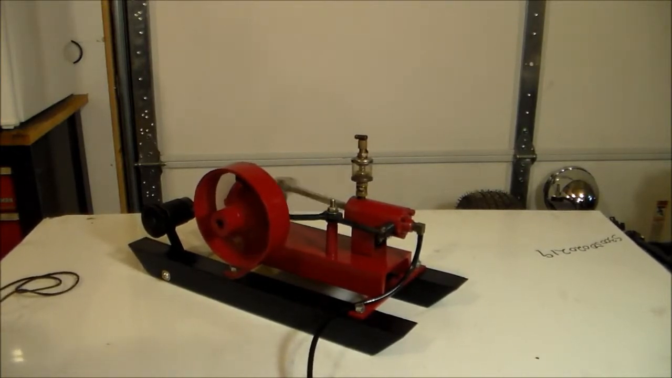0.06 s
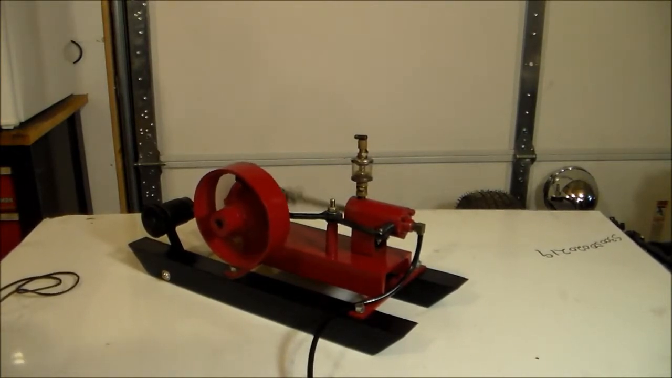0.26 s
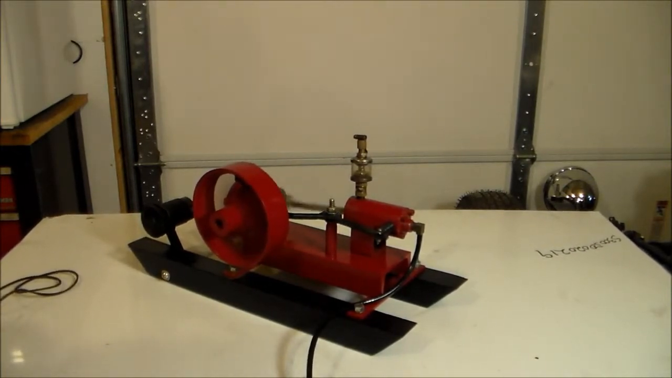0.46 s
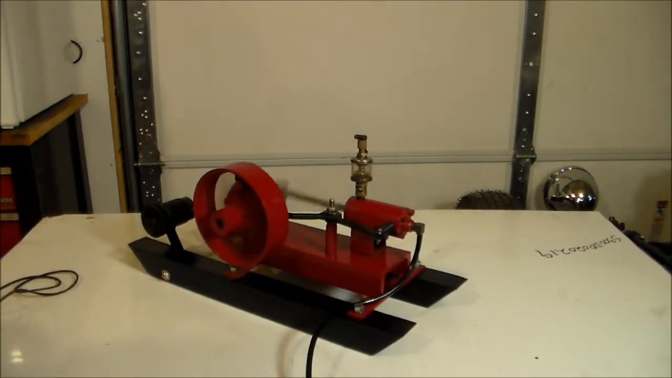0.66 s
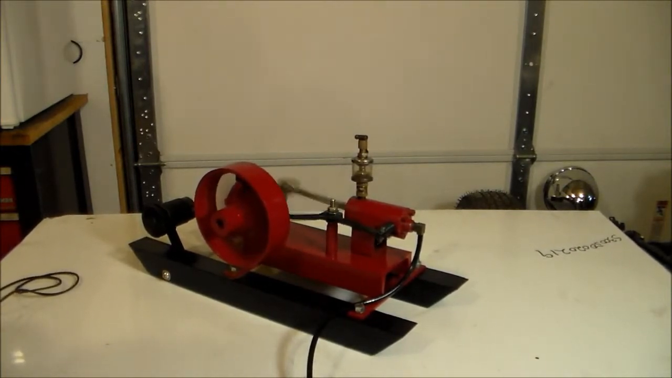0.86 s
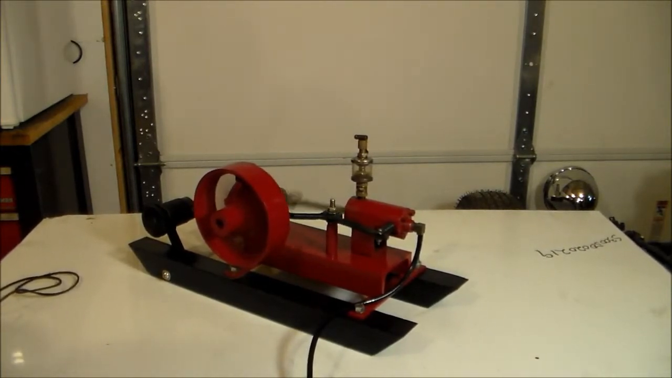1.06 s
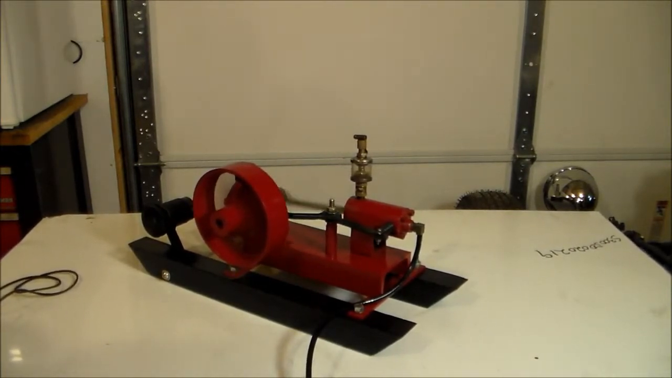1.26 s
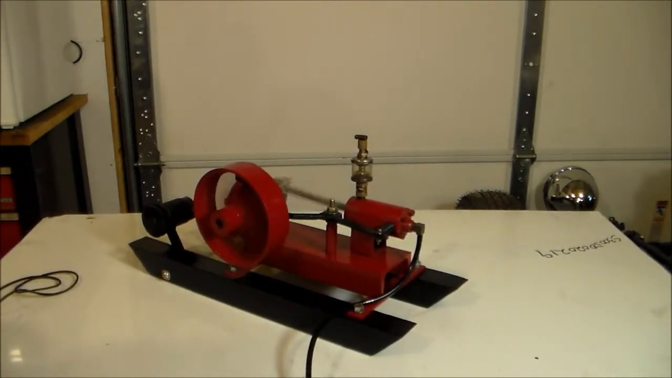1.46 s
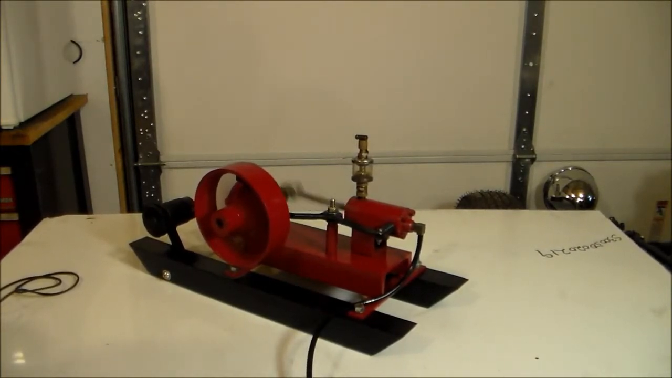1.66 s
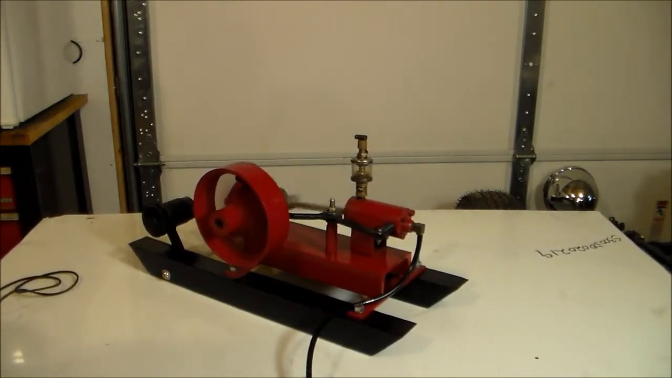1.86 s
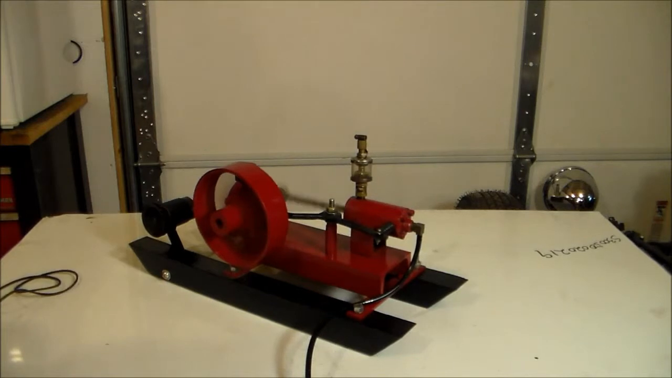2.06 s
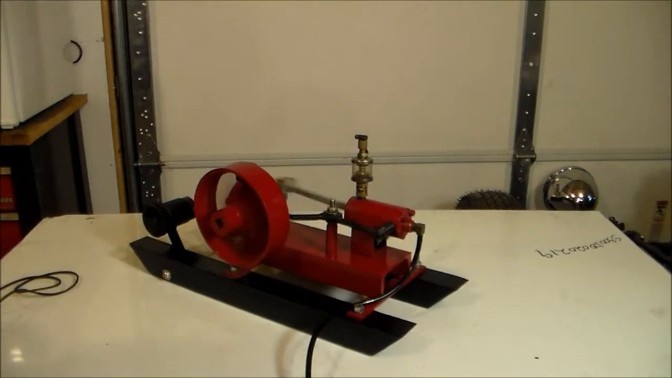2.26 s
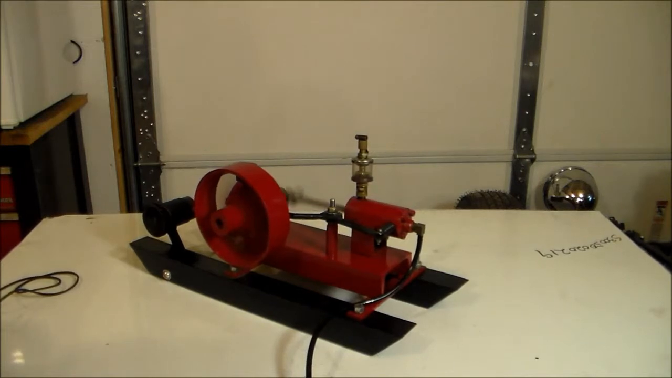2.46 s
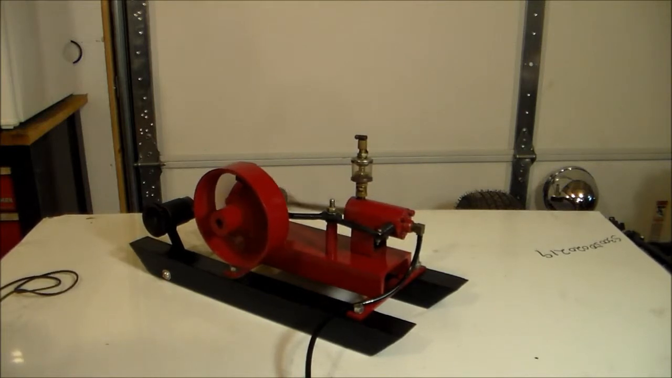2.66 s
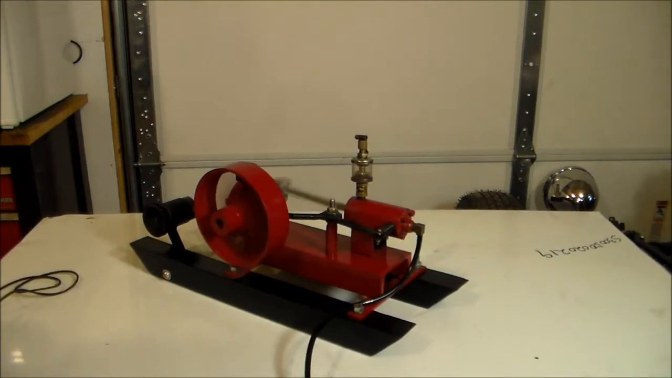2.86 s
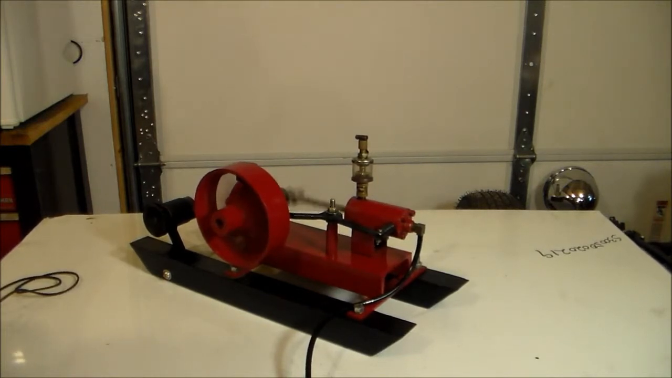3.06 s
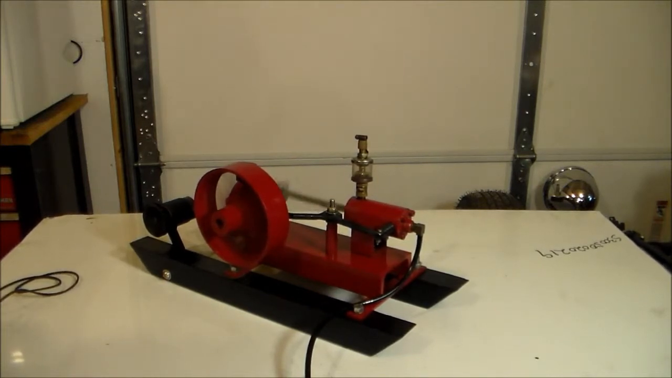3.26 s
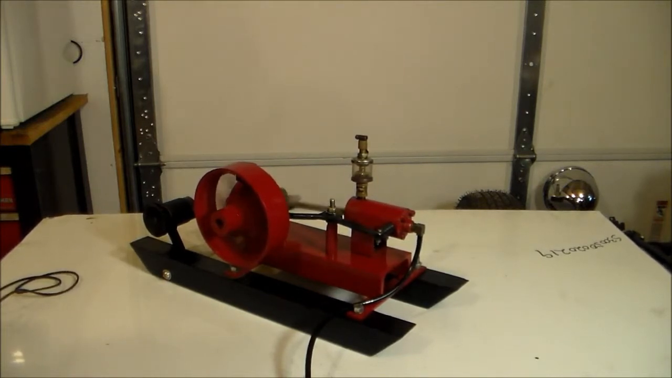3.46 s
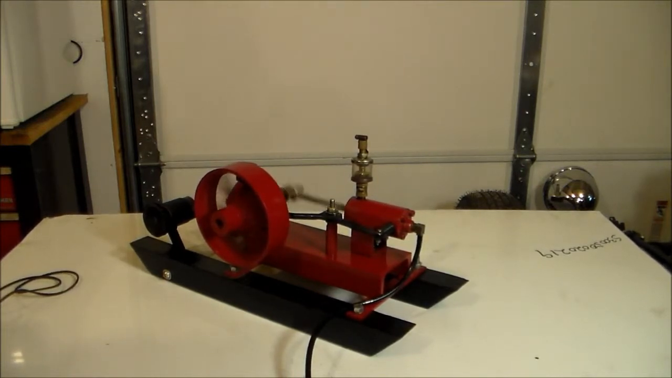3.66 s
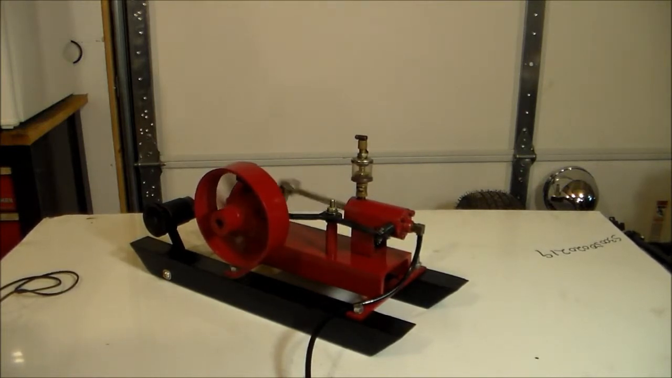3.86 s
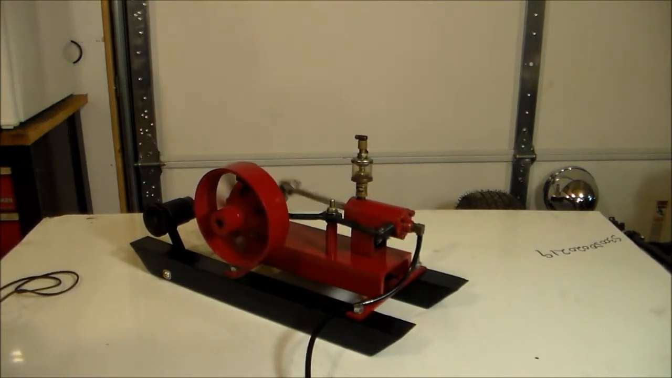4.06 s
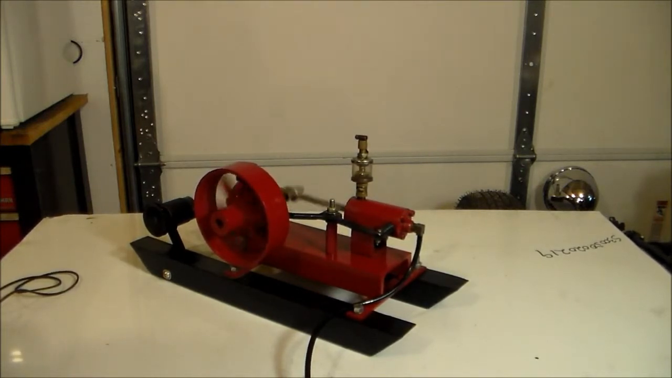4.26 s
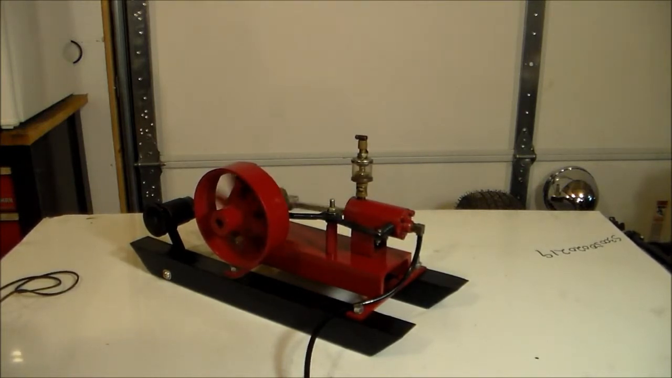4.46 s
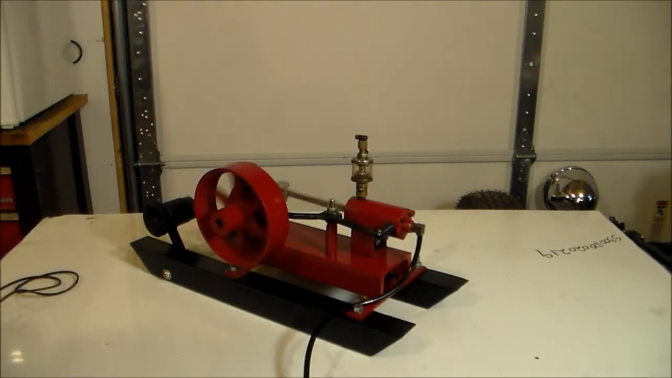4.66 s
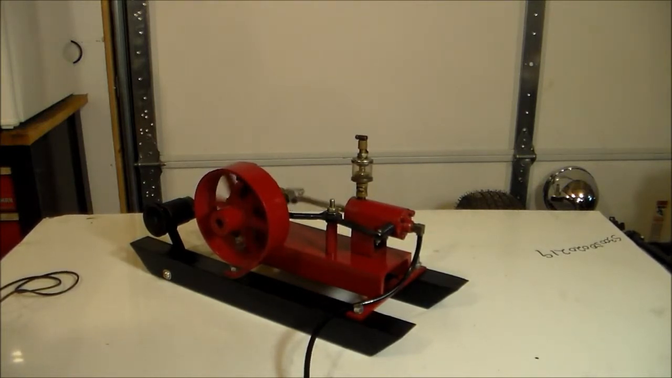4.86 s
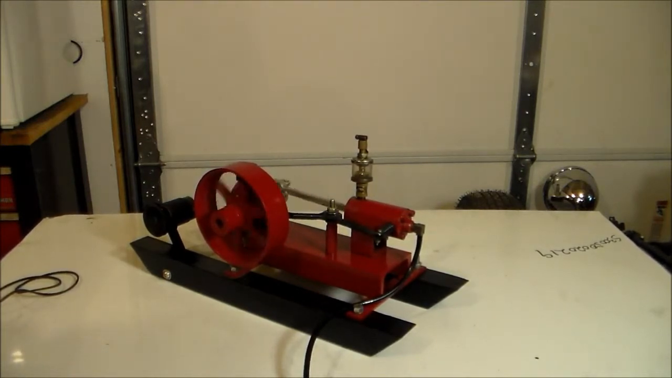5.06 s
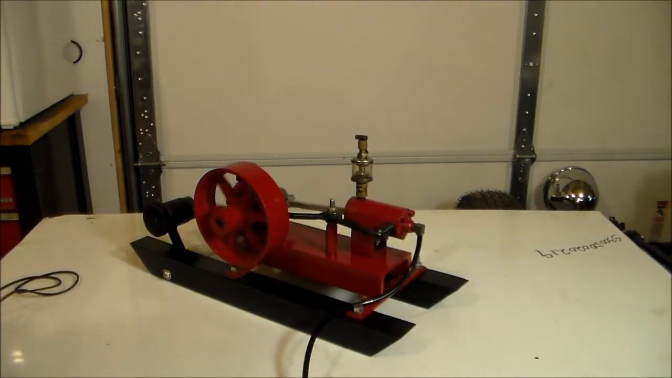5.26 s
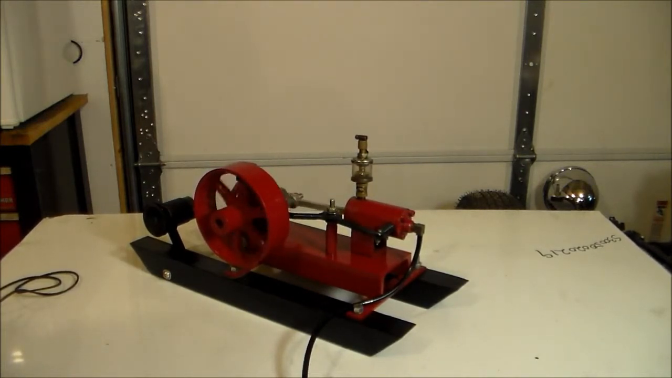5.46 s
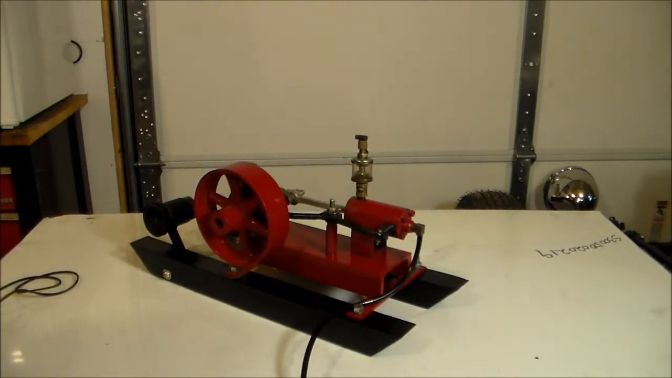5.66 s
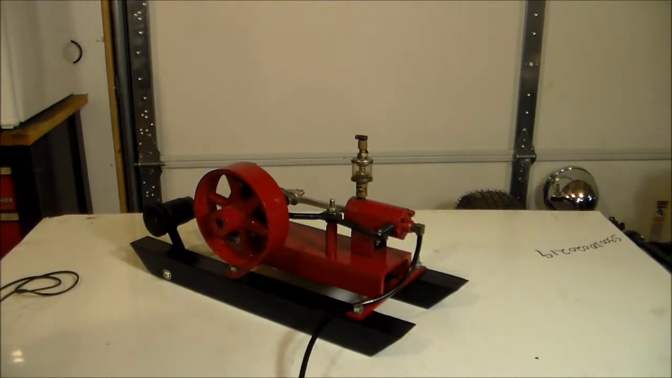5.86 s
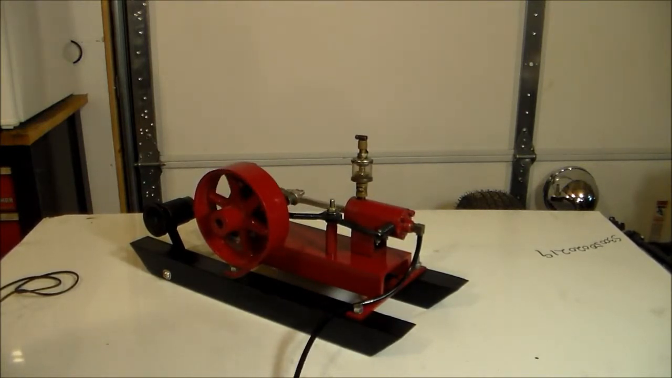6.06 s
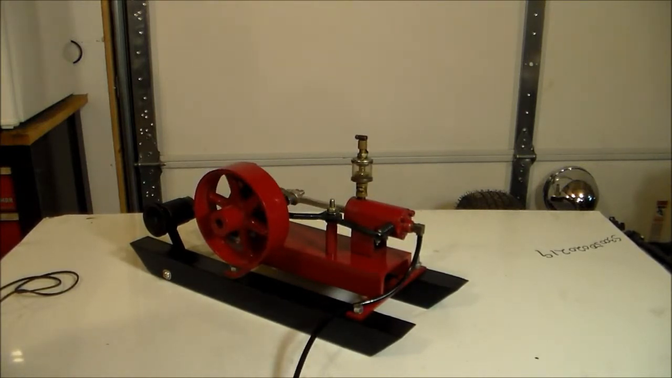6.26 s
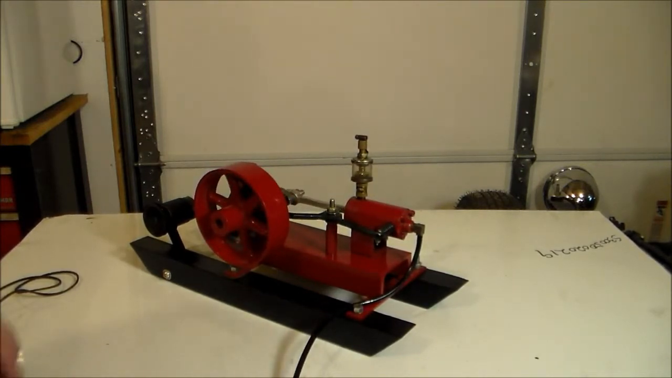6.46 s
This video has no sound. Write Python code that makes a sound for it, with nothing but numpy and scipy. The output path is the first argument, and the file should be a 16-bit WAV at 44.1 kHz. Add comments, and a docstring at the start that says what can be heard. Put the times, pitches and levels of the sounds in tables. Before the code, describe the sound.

A small air-driven model engine clatters fast and evenly, then slows to separate metallic knocks and stops in a quiet workshop.

```python
"""On a workshop table a small single-cylinder model engine runs on compressed air, then coasts to a
stop with the air shut off. The crank angle times the contacts: once a turn the valve gear ticks and the
slack linkage knocks twice, rattling in between; each impact excites the modes of the frame. The exhaust
puffs, bearings rub and air leaks. Slow turns knock duller and bounce. The flywheel comes to rest with
a few soft ticks, and something shuffles faintly in the room."""
import sys
import numpy as np
from scipy import signal
from scipy.fft import rfft, irfft
from scipy.io import wavfile
from scipy.ndimage import uniform_filter1d

SR = 44100
rng = np.random.default_rng(int(sys.argv[2]) if len(sys.argv) > 2 else 0)


def output_pcm(signal):
    """Save a mono or channel-first signal as 16-bit PCM at the path in sys.argv[1].

    Samples are clipped to [-1, 1] before scaling.
    """
    pcm = np.clip(np.atleast_2d(signal).T, -1, 1) * 32767
    wavfile.write(sys.argv[1], SR, np.round(pcm).astype(np.int16))


N = 287973
TAPS = 16384
GRID_HZ = np.maximum(np.arange(TAPS // 2 + 1) * SR / TAPS, 1)

# Levels in all tables are relative: each source applies its own gain.
# flywheel speed, steady and then braked by friction: time_s, turns_per_s
FLYWHEEL_SPEED = [(0.0, 8.736), (1.0, 8.633), (2.2, 8.618), (2.85, 8.566), (3.15, 8.001), (3.7, 6.249),
                  (4.4, 4.215), (4.95, 2.725), (5.6, 0.0)]

# contacts made once a turn: turns_per_s, level_db, body_db, treble_db
TAKE_UP_KNOCK = [(2, -22, 1, -7.5), (3.5, -26.5, 2, -4), (5, -24, 3.5, -5.5), (7, -25.5, 0, -4),
                 (8.6, -26, -1.5, 1.16)]  # the linkage takes up its slack
REBOUND_CLICK = [(3.3, -41, -2, 2), (4, -30, 0, -0.5), (5.8, -28.5, 1, 2), (7.2, -36, 0, 6),
                 (8.6, -38.5, 7.5, 2)]  # it rebounds crisply
GUIDE_CLICK = [(4.4, -47, -6, -9), (5.5, -31, 2, -6), (7, -31.5, 5, -11), (8.6, -29.5, 0.5, -0.5)]  # it clips its guide
FALL_BACK_KNOCK = [(2, -23, -5, -16), (3.2, -23, -3.5, -7), (3.9, -24.5, -0.5, 0), (4.8, -27, 3.5, 2.5),
                   (8.6, -27, 1.7, 1)]  # it falls back
VALVE_TICK = [(2.2, -44, 9, -9), (3.8, -44, 12.5, -19.5), (5.5, -44, 10, -30), (8.6, -50.5, 14, -23)]  # the valve gear ticks softly
# single contacts on the last turns: start_s, level_db, body_db, treble_db
LINKAGE_BOUNCES = [(4.518, -30, -7, -4.5), (4.788, -27.5, 5, -3), (4.799, -26, 0, -2.5),
                   (5.194, -26, -5, -10.5)]
BEARING_TICKS = [(4.860, -36, -8, -13), (4.913, -42, 12, -13), (5.297, -48, 12.5, -7),
                 (5.402, -49.5, 15, -2)]
# slow swell in the weight of the take-up knock: time_s, gain_db
KNOCK_SWELL = [(0, 1), (1.03, -3), (1.17, 1.4), (2.3, 0), (2.43, -2.8), (2.88, -2.5), (3.02, 2), (3.3, -4),
               (3.6, 0)]
# noises of the running engine: time_s, rub_db, leak_db, rattle_db
RUNNING_LEVELS = [(0, -45, -42, -33.5), (2, -49.5, -41, -31), (2.9, -43, -43.5, -32.5),
                  (3.4, -47.5, -51, -35), (3.9, -45.5, -70, -36), (4.4, -48, -65, -52),
                  (4.85, -53.5, -54, -55), (5.2, -70, -69, -56), (5.55, -71, -76, -75),
                  (6.53, -80, -81, -80)]
# sources whose strength follows the speed: turns_per_s, level_db
EXHAUST_LEVEL = [(2, -34.5), (4.6, -33.5), (6, -39.5), (7.3, -33), (8.6, -47)]
DRAG_LEVEL = [(0, -79), (.5, -56.5), (2, -39), (4, -35), (6.5, -49), (8.6, -45)]
JET_LEVEL = [(0, -100), (2.5, -77), (5, -58), (7.5, -59), (8.6, -54)]
RIM_LEVEL = [(0, -100), (2, -72), (4.5, -54), (6.5, -54.5), (8.6, -49)]
# load on the crank around one turn: angle_turns, gain_db
CRANK_LOAD = [(.2, -3), (.5, -5), (.82, -20), (.88, 0.5)]

# resonances: pitch_hz, width_hz, level_db
FRAME_MODES = [(178.6, 13.4, 1.5), (242, 23, -2.5), (308, 26, -2), (404.3, 21, 1), (471.4, 19, -1.5),
               (574, 29, -2), (625, 27, 2), (715, 93, -2.5), (769, 31, -1), (865, 62, -1.5), (962, 41, 4.5),
               (1026, 5.9, 10.5), (1178, 26, 4), (1307, 31, 4), (1480, 83, -1), (1693, 65, -1),
               (2285, 14, 11), (2382, 3.6, 8.5), (2390, 136, 6), (2686, 62, 2.5), (2950, 6.1, 7.5),
               (3520, 79, 7.5), (3760, 35, 5.5), (4130, 150, 3), (4660, 230, -4.5), (5350, 33, 1.5),
               (7320, 970, 1.5), (8700, 29, 5.5), (9860, 130, 5.5), (12500, 340, -11)]  # frame, flywheel and table together
TAKE_UP_MODES = [(1330, 230, 6.5), (1725, 110, 3), (2400, 220, 4.5), (3530, 41, 3.5)]  # heard mainly from the first knock
FALL_BACK_MODES = [(823, 130, 3.5), (2700, 110, 5), (5500, 31, 0.5), (9670, 90, 8), (12000, 70, 4)]  # heard mainly from the second
FLYWHEEL_MODES = [(282, 10, 2), (1044, 20, 9), (1122, 9.9, 17.5), (2420, 38, 10)]  # ring on after light contacts
DRAG_MODES = [(113.6, 8.2, 2), (201, 18, -4.5), (281, 3.9, 4.5), (454, 22, -1), (593, 31, 5),
              (712, 32, 1.5), (940, 60, -22), (1090, 20, 4.5), (1200, 24, 1), (2480, 120, -3)]  # stirred by the dragging crank
RIM_MODES = [(2300, 36, 1.5), (2365, 35, -1.5)]  # flywheel rim, driven by the rubbing bearing
JET_MODES = [(8740, 210, 0)]  # thin sizzle of the air jet at the valve
WHISTLE_MODES = [(2620, 60, -12), (2730, 21, 15), (8780, 230, -12)]  # air passing the valve
# broad spectra: frequency_hz, level_db
DAMPED_MODE_BED = [(40, -17), (90, -9.5), (340, -13), (530, -20), (660, -2), (1400, -5), (2000, -2),
                   (3200, -2), (5000, -3.5), (6000, -7), (8200, -15), (9000, -2.5), (10500, -2.5),
                   (11700, -6), (14000, -3)]  # overlapping modes beneath the frame's distinct ones
RUB_SPECTRUM = [(60, 3), (170, 11), (450, 5), (1000, 6.5), (1700, 0.5), (2320, -1.5), (3000, 1), (6000, 0),
                (14000, -18)]
LEAK_SPECTRUM = [(500, -1.5), (2500, 5), (5500, -1.5), (6700, 0), (8000, -3.5), (9000, -1), (10500, -5),
                 (11500, 3.5), (14000, -3.5)]
ROOM_NOISE_SPECTRUM = [(20, -0.5), (32, 1.5), (60, -7), (120, -9), (200, -25), (500, -24), (1500, -26),
                       (2600, -28), (5000, -36), (9000, -32.5), (14000, -35)]
SHUFFLE_SPECTRUM = [(40, 4.5), (110, -1), (150, -13), (198, 5.5), (250, -8), (450, -5), (800, -14.5),
                    (2000, -17.5), (3600, -17.5), (5000, -28), (12000, -52)]
MICROPHONE_SPECTRUM = [(20, 2), (60, -6.5), (120, -14), (250, -20.5), (600, -14.5), (1500, -22),
                       (5000, -22.5), (8500, -30), (14000, -28)]

# quiet sounds of the room: time_s, room_noise_db, shuffle_db
AMBIENT_LEVELS = [(0, -59.5, -65), (5.55, -61, -100), (5.76, -51, -59), (5.96, -54.5, -62.5),
                  (6.1, -56.5, -48), (6.2, -57, -52), (6.33, -59, -57.5), (6.53, -57, -68)]
# reverberation time of the workshop: frequency_hz, t60_s
ROOM_T60 = [(150, 1.46), (400, 0.27), (1000, 0.47), (2800, 0.29), (7300, 0.23), (14000, 0.46)]
# strength of its echoes: frequency_hz, level_db
ECHO_LEVEL = [(150, -2), (400, 2.5), (1000, -3.5), (2000, -10.5), (4000, -8), (8000, -8), (14000, -11)]
# diffuse sound at two close microphone ports: frequency_hz, side_over_mid_db
STEREO_WIDTH = [(30, -13), (70, -21), (160, -20), (1400, -24), (2500, -61), (3600, -9.5), (4800, 1),
                (6000, 2.5), (14000, 2)]
# balance of the ports: frequency_hz, left_over_right_db
STEREO_BALANCE = [(30, -9.5), (90, 1.27), (4000, -1.2), (5000, 0.1), (7200, 3), (10500, 2.5), (13000, -1)]


def crank():
    """Angle is the integral of speed: (turns_per_s, angle_turns) at every sample."""
    speed, = in_time(FLYWHEEL_SPEED)
    return speed, .059 + np.cumsum(speed) / SR


def each_turn(angle, strength, scatter_db, advance_turns=0):
    """Rotation repeats a contact once a turn: rows of start_s, level_db, body_db, treble_db."""
    speed, turns = crank()
    advance = advance_turns * (1 - speed / speed.max()) ** 2  # earlier as the speed drops
    turns = np.maximum.accumulate(turns + advance)
    at = np.searchsorted(turns, np.arange(angle, turns[-1]))
    scatter = rng.standard_normal((len(at), 3)) * [scatter_db, 1.05, 1.05]
    return np.column_stack([at / SR, np.transpose(lookup(strength, speed[at])) + scatter])


def take_up_contacts():
    """Backlash closes at angle zero; the knock's weight swells and fades while its treble stays even."""
    start_s, level_db, body_db, treble_db = each_turn(0, TAKE_UP_KNOCK, scatter_db=1.47).T
    swell_db, = lookup(KNOCK_SWELL, start_s)
    return np.transpose([start_s, level_db + swell_db, body_db - swell_db / 2, treble_db - swell_db])


def impacts(contacts, gain_db, thump_db, body_db, treble_db, decay_s, rise_s, touch_db, touch_s):
    """Inertia shapes an impact: parts brush, the treble leads, heavy parts follow and shake longest."""
    lead = SR // 100
    age = (np.arange(SR // 18) - lead) / SR + 0.0023
    after = np.maximum(age, 0)
    touch = from_db(touch_db) * np.exp(-abs(age) / touch_s)
    heavy, middle, sharp = [touch + (1 - np.exp(-(after / rise) ** 2)) * np.exp(-after / decay)
                            for rise, decay in zip((rise_s, rise_s, .0009), decay_s)]
    # thump, body, middle and treble bands
    splits_hz = (340, "low"), ([340, 1900], "band"), ([1900, 5500], "band"), (5500, "high")
    bands = [signal.butter(3, hz, kind, fs=SR, output="sos") for hz, kind in splits_hz]
    force = np.zeros(N + len(age))
    for start_s, level_db, body, treble in contacts:
        at = max(round(start_s * SR), 0)
        bands_db = thump_db, body + body_db, 0, treble + treble_db
        for band, envelope, band_db in zip(bands, (heavy, heavy, middle, sharp), bands_db):
            burst = rms_one(envelope * rng.standard_normal(len(age)))
            force[at:at + len(age)] += from_db(level_db + gain_db + band_db) * signal.sosfilt(band, burst)
    return force[lead:lead + N]


def frame(force, own_modes=()):
    """Modal response: a contact rings the common frame plus any resonances of its own."""
    power = from_db(at_hz(DAMPED_MODE_BED)) ** 2 + resonances(FRAME_MODES) + resonances(own_modes)
    return colour(force, rms_one(np.sqrt(power)))


def take_up_knocks(take_up):
    """Impact and elastic rebound: the linkage strikes home, springs back and clips its guide."""
    force = impacts(take_up, gain_db=-5, thump_db=5.5, body_db=-.5, treble_db=-1,
                    decay_s=(.0069, .0051, .0028), rise_s=.0023, touch_db=-24, touch_s=.0038)
    rebound_s, wander_s = .0074, .002
    rebounds = [(s + rebound_s, *levels) for s, *levels in each_turn(0, REBOUND_CLICK, scatter_db=3.5)]
    clicks = [(s + wander_s * rng.standard_normal(), *levels)
              for s, *levels in each_turn(.118, GUIDE_CLICK, scatter_db=.5)]
    light_contacts = rebounds + clicks + LINKAGE_BOUNCES
    force += impacts(light_contacts, gain_db=-6.5, thump_db=-4, body_db=-3, treble_db=1.5,
                     decay_s=(.0045, .0042, .0039), rise_s=.0011, touch_db=-41, touch_s=.00099)
    return frame(force, TAKE_UP_MODES)


def fall_back_knocks(fall_back):
    """Backlash gives a second impact each turn as the linkage falls back across its slack."""
    force = impacts(fall_back, gain_db=-5.5, thump_db=.5, body_db=0, treble_db=-.5,
                    decay_s=(.013, .0054, .0056), rise_s=.0029, touch_db=-20.5, touch_s=.0028)
    return frame(force, FALL_BACK_MODES)


def linkage_rattle(take_up, fall_back, level_db, settle_s=.0078):
    """Clearance lets the linkage rattle between its two knocks, the more after a hard take-up."""
    loose, usual_db = np.zeros(N), np.mean(take_up[:, 1])
    for (start_s, knock_db, *_), (end_s, *_) in zip(take_up, fall_back):
        floating = slice(round((start_s + settle_s) * SR), round((end_s + settle_s) * SR))
        loose[floating] = from_db(.53 * (knock_db - usual_db))
    envelope = from_db(level_db) * uniform_filter1d(loose, size=150)
    return frame(envelope * grains(per_s=12000, spread_db=-.5))


def soft_ticks():
    """Free vibration: frame and flywheel ring on after light contacts in valve gear and bearings."""
    valve = [row for angle in (.86, .91) for row in each_turn(angle, VALVE_TICK, scatter_db=2.6)]
    force = impacts(valve + BEARING_TICKS, gain_db=-9, thump_db=-13, body_db=1, treble_db=-1.5,
                    decay_s=(.0093, .007, .005), rise_s=.0011, touch_db=-17, touch_s=.004)
    return frame(force, FLYWHEEL_MODES)


def exhaust_puffs(start_s, pitch_hz=414, ring_s=.014, swell_s=.0031):
    """Cavity resonance: each puff from the exhaust valve rings the hollow under the cylinder."""
    age, openings = np.arange(SR // 5) / SR, np.zeros(N)
    openings[np.round(start_s * SR).astype(int)] = 1
    puff = np.sin(2 * np.pi * pitch_hz * age) * (1 - np.exp(-age / swell_s)) * np.exp(-age / ring_s)
    level_db, = lookup(EXHAUST_LEVEL, crank()[0])
    return 2 * through(openings * from_db(level_db), puff)


def crank_drag():
    """Dry friction follows the load around each turn and is loudest at moderately low speed."""
    speed, turns = crank()
    level_db = lookup(DRAG_LEVEL, speed)[0] + np.interp(turns, *np.transpose(CRANK_LOAD), period=1)
    scrape = colour(grains(per_s=2100, spread_db=2), np.sqrt(resonances(DRAG_MODES)))
    return from_db(level_db - 4.5) * rms_one(scrape)


def bearing_rub(level_db):
    """Sliding friction: a dense stream of tiny contacts in the bearings drives the frame."""
    force = colour(grains(per_s=7000, spread_db=1), from_db(at_hz(RUB_SPECTRUM)))
    return from_db(level_db) * rms_one(frame(force))


def air_leak(level_db, swell_db=11.5, side_db=-3.5):
    """Turbulent air escapes on all sides, more as pressure builds towards each stroke: (mid, side)."""
    phase = crank()[1] % 1
    envelope = from_db(level_db + 4 + swell_db * (phase - 1))
    return envelope * np.array([hiss(LEAK_SPECTRUM), from_db(side_db) * hiss(LEAK_SPECTRUM)])


def singing(modes, levels):
    """Forced vibration: friction or air sustains sharp resonances while the engine turns."""
    level_db, = lookup(levels, crank()[0])
    return from_db(level_db) * rms_one(colour(rng.standard_normal(N), resonances(modes)))


def valve_whistle():
    """Resonance picks a faint, steady whistle out of the noise of air passing the valve."""
    return from_db(-75.5) * rms_one(colour(rng.standard_normal(N), np.sqrt(resonances(WHISTLE_MODES))))


def workshop(x, onset_s=.004, glance_db=-10, side_db=-3):
    """Reverberation: dense wall echoes follow the direct sound, longest in the bass: (mid, side)."""
    length = SR * 2 // 3
    age, echoes = np.arange(length) / SR, 0
    white, hz = rfft(rng.standard_normal((2, length))), np.arange(length // 2 + 1) * SR / length
    edges_hz = np.geomspace(50, 16000, 18)
    for low, high in zip(edges_hz, edges_hz[1:]):
        centre = np.sqrt(low * high)
        tail = irfft(white * (hz >= low) * (hz < high)) * from_db(-60 * age / at_hz(ROOM_T60, centre))
        tail = rms_one(tail * (1 - np.exp(-(age / onset_s) ** 2)))
        echoes += tail * from_db(at_hz(ECHO_LEVEL, centre)) * np.sqrt(2 * (high - low) / SR / length)
    # sound glancing off the table and the turning parts reaches the ports unevenly
    glance = through(x, rms_one(rng.standard_normal(SR // 400)) / np.sqrt(SR // 400))
    shifting = rms_one(uniform_filter1d(rng.standard_normal(N), size=200))
    side = from_db(side_db) * through(x, echoes[1]) + from_db(glance_db) * glance * shifting
    return np.array([x + through(x, echoes[0]), side])


def room_background():
    """A diffuse field of low noise, with a faint shuffle in the centre: (mid, side)."""
    noise_db, shuffle_db = in_time(AMBIENT_LEVELS)
    mid, side = from_db(noise_db) * np.array([hiss(ROOM_NOISE_SPECTRUM), hiss(ROOM_NOISE_SPECTRUM)])
    return np.array([mid + from_db(shuffle_db) * hiss(SHUFFLE_SPECTRUM), side])


def microphones(mid, side):
    """Long waves reach two close ports alike, short ones differ; each adds self-noise: (left, right)."""
    side = colour(side, from_db(at_hz(STEREO_WIDTH)))
    lean = from_db(at_hz(STEREO_BALANCE) / 2)
    self_noise = from_db(-57.5) * np.array([hiss(MICROPHONE_SPECTRUM), hiss(MICROPHONE_SPECTRUM)])
    return np.array([colour(mid + side, lean), colour(mid - side, 1 / lean)]) + self_noise


def resonances(modes):
    """Damped oscillators add in power: their summed response on GRID_HZ."""
    return sum(from_db(db) ** 2 / (1 + ((GRID_HZ ** 2 - hz ** 2) / (GRID_HZ * width)) ** 2)
               for hz, width, db in modes)


def grains(per_s, spread_db):
    """Shot noise: independent tiny contacts of uneven size, rms 1."""
    sizes = from_db(spread_db * np.minimum(rng.exponential(1, N), 4))
    return rms_one(rng.standard_normal(N) * sizes * (rng.random(N) < per_s / SR))


def hiss(spectrum):
    """Filtered white noise takes on the given spectrum, rms 1."""
    return rms_one(colour(rng.standard_normal(N), from_db(at_hz(spectrum))))


def colour(x, gain):
    """Minimum-phase filtering: folding the cepstrum makes a gain on GRID_HZ causal."""
    cepstrum = irfft(np.log(gain + 1e-9))
    cepstrum[1:TAPS // 2] *= 2
    cepstrum[TAPS // 2 + 1:] = 0
    return through(x, irfft(np.exp(rfft(cepstrum))))


def through(x, response):
    """Convolution with an impulse response."""
    return signal.fftconvolve(x, response)[:N]


def lookup(rows, at):
    """Linear interpolation of a table's later columns along its first."""
    known, *columns = np.transpose(rows)
    return [np.interp(at, known, column) for column in columns]


def in_time(rows):
    """Linear interpolation of a time table at every sample."""
    return lookup(rows, np.arange(N) / SR)


def at_hz(points, hz=GRID_HZ):
    """Interpolation on a log-frequency axis."""
    known_hz, value = np.transpose(points)
    return np.interp(np.log(hz), np.log(known_hz), value)


def from_db(db):
    """Amplitude ratio of a level in decibels."""
    return 10 ** (np.asarray(db) / 20)


def rms_one(x):
    """Normalisation to unit rms."""
    return x / np.sqrt(np.mean(x ** 2) + 1e-20)


def scene():
    """Superposition: the engine, its air and the room add at the microphones."""
    rub_db, leak_db, rattle_db = in_time(RUNNING_LEVELS)
    take_up = take_up_contacts()
    fall_back = each_turn(.192, FALL_BACK_KNOCK, scatter_db=.45, advance_turns=.108)
    parts = (take_up_knocks(take_up),
             fall_back_knocks(fall_back),
             soft_ticks() + linkage_rattle(take_up, fall_back, rattle_db) + bearing_rub(rub_db),
             crank_drag() + exhaust_puffs(take_up[:, 0]))
    engine = sum(workshop(part) for part in parts)  # each part meets the walls from its own place
    mid, side = engine + air_leak(leak_db) + room_background()
    mid += valve_whistle() + singing(JET_MODES, JET_LEVEL) + singing(RIM_MODES, RIM_LEVEL)
    return microphones(mid, side)


def record(dry):
    """Band limiting: a steep elliptic low-pass removes the highest treble."""
    cutoff_hz = 14250
    return signal.sosfilt(signal.ellip(10, .2, 70, cutoff_hz, fs=SR, output="sos"), dry)


dry = scene()
out = record(dry)
output_pcm(out)
```